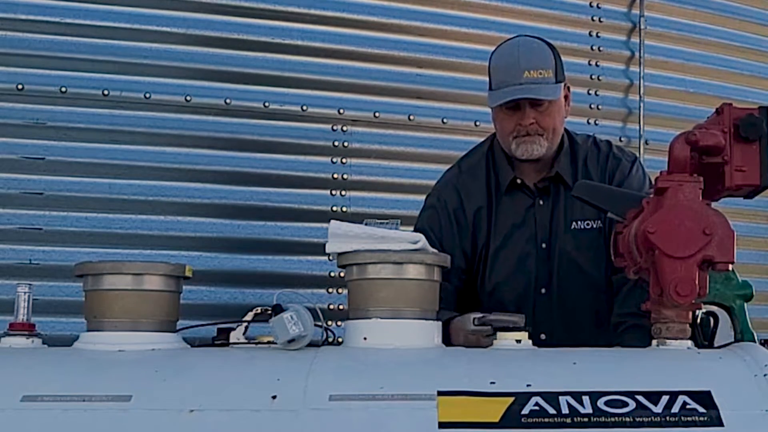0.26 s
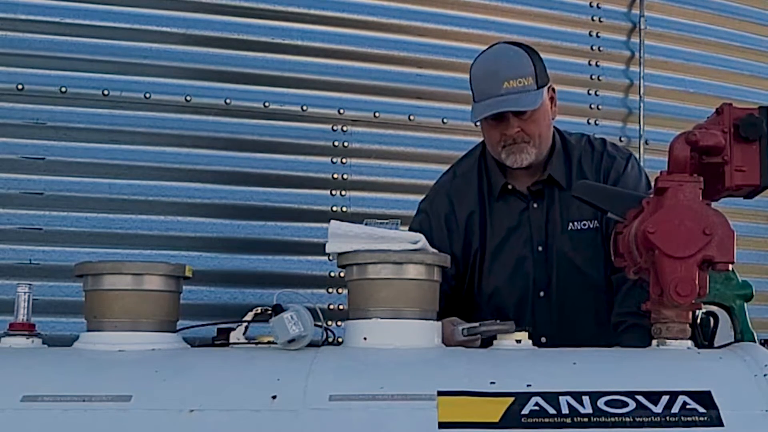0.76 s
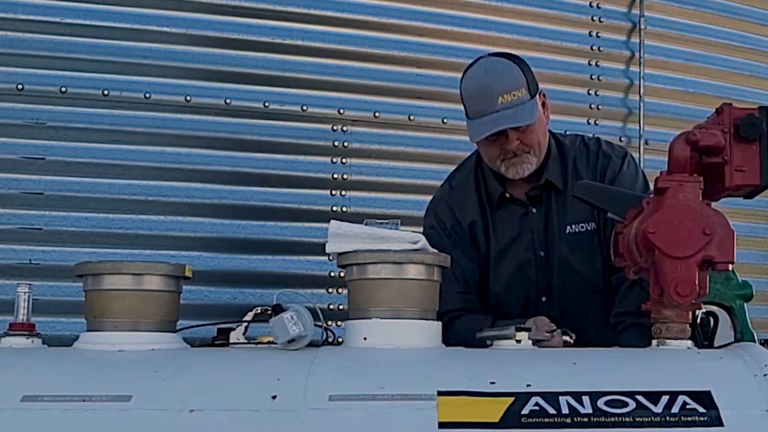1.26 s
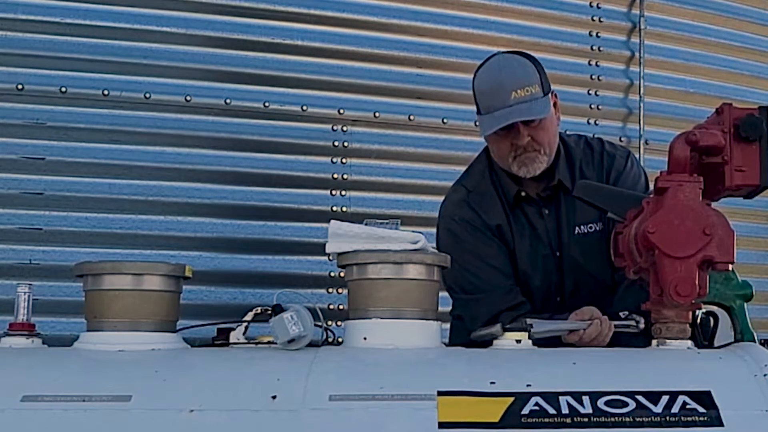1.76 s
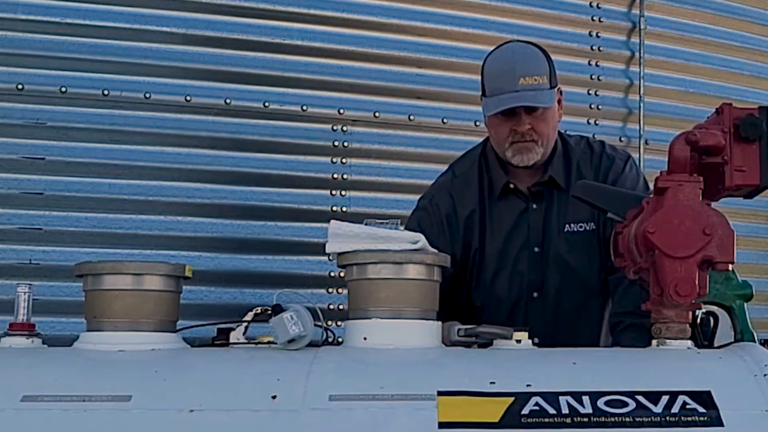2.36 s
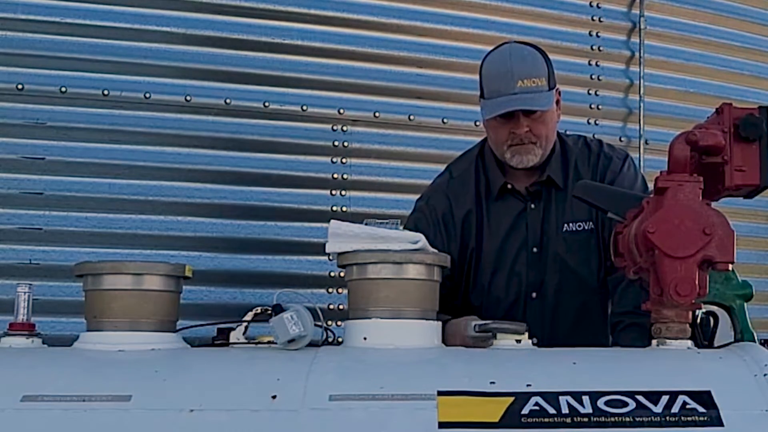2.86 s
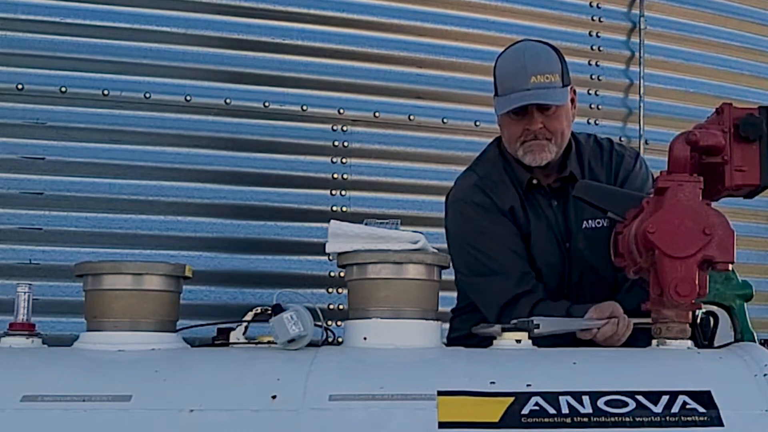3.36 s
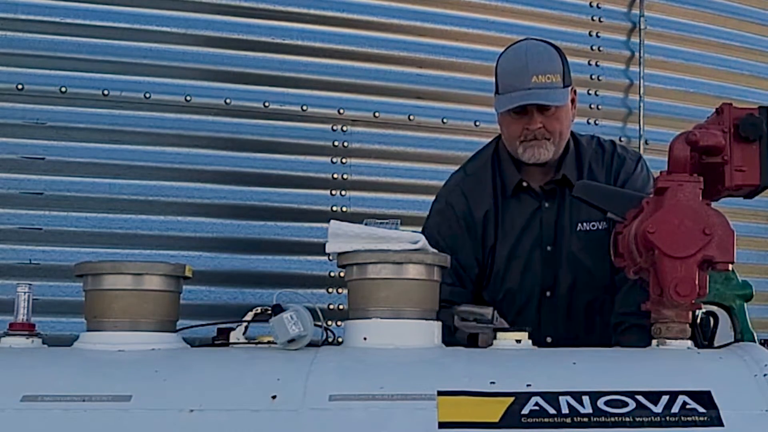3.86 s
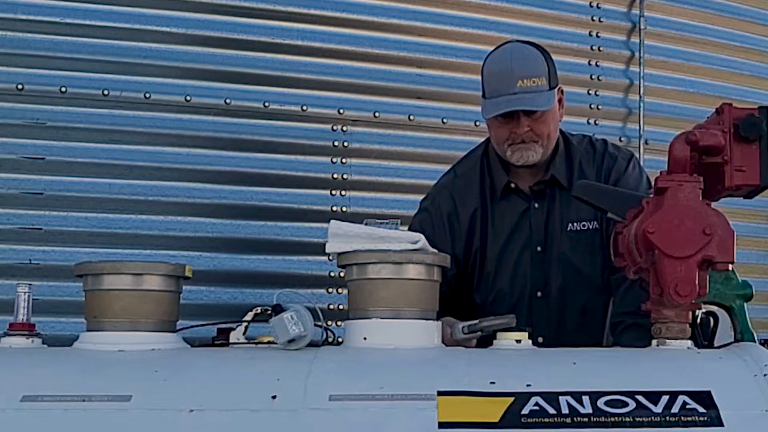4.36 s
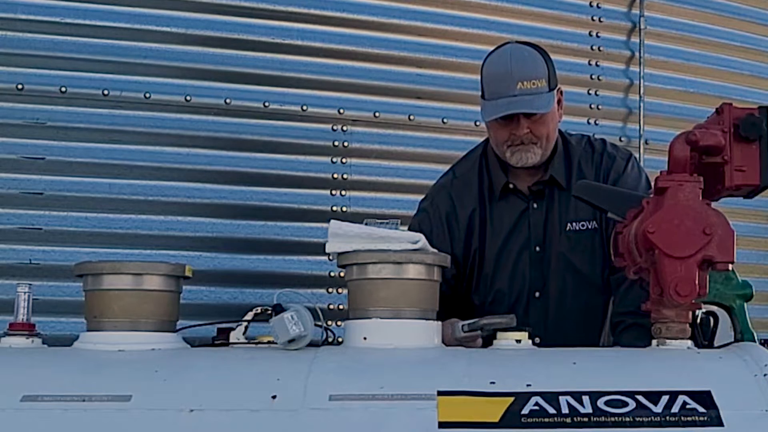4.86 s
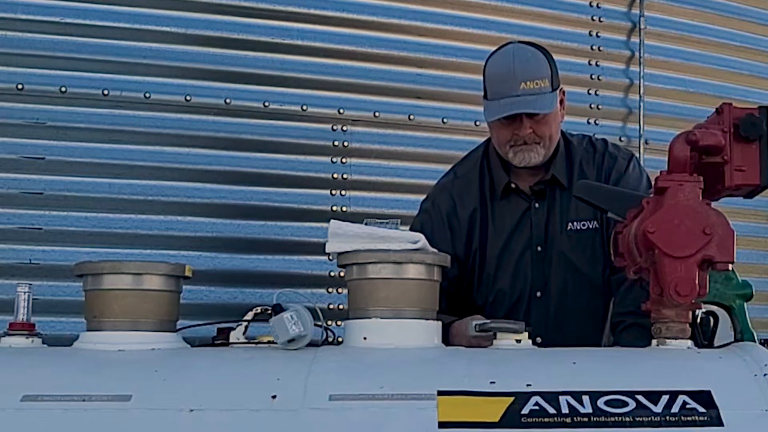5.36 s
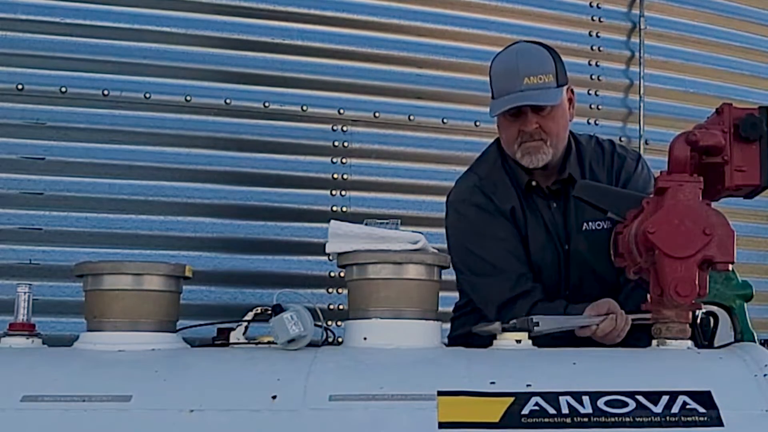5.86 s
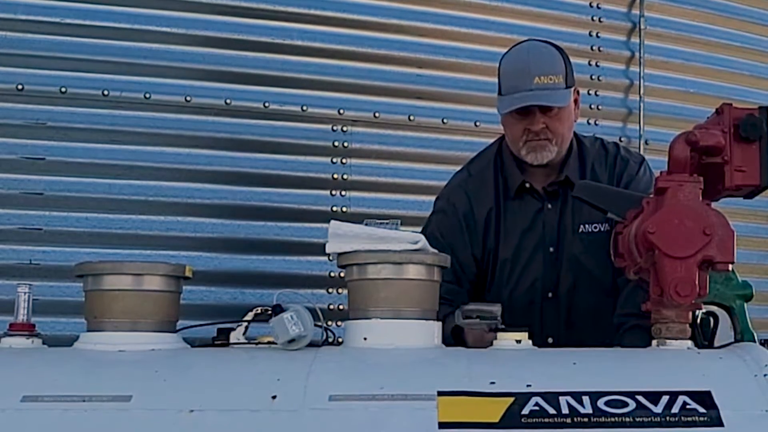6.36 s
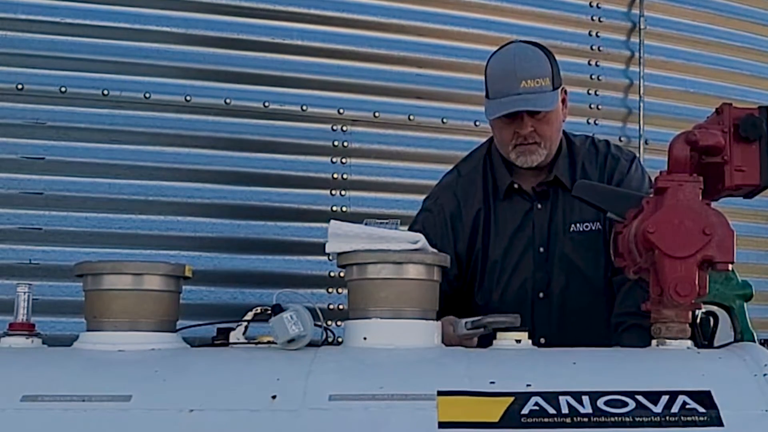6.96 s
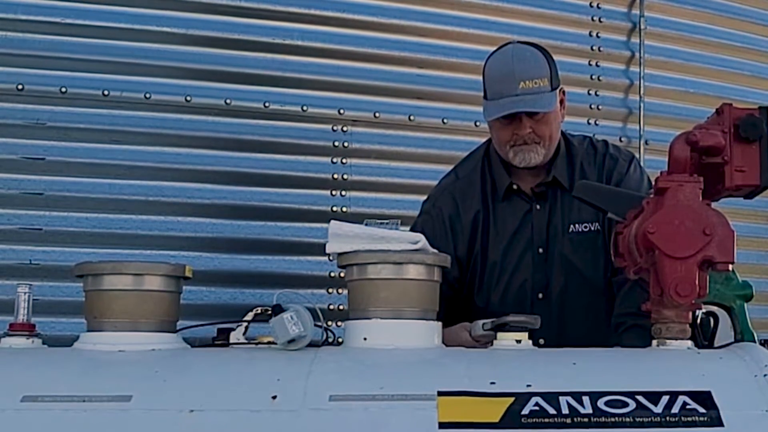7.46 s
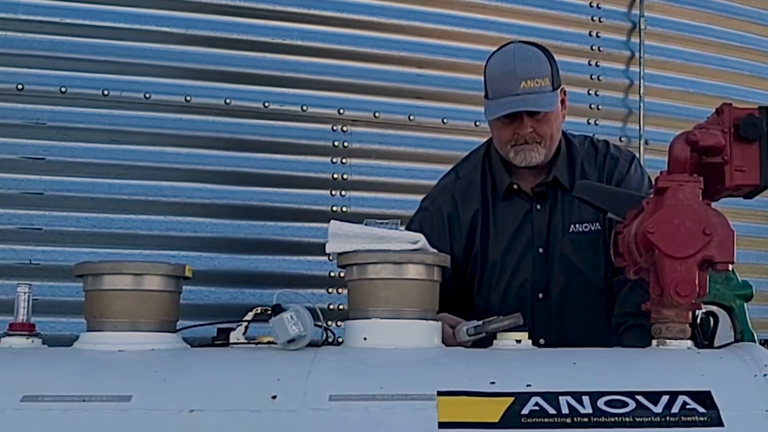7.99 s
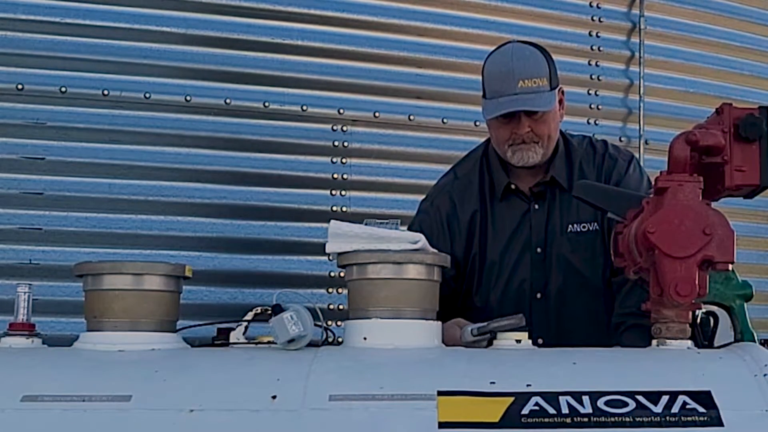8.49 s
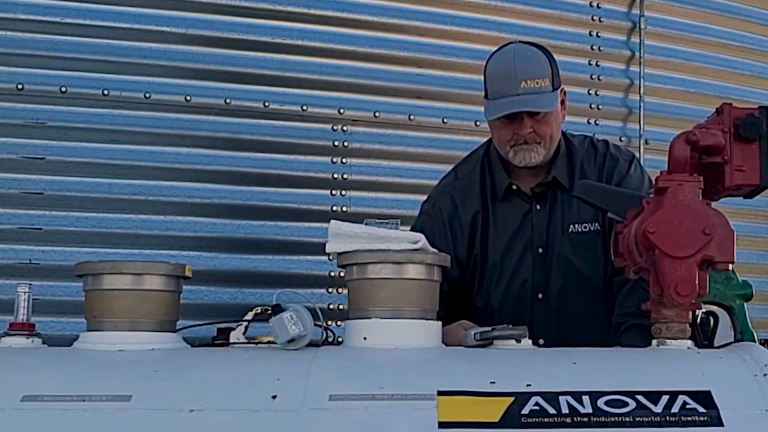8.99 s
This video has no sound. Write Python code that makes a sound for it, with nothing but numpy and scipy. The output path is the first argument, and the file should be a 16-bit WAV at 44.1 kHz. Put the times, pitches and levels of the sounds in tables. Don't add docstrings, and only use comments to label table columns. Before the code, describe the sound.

Outdoors, a couple of metres from a phone, a pipe wrench is worked round a fitting on a large steel tank. A ringing hit opens, then threads drag and scrape, knocks and loose-jaw clinks come in uneven clusters, each with a hollow low ring. Wind gusts rumble and thump the microphone, strongest past the middle. After a quieter gap, heavy booming bangs end it, over a faint hiss that swells with the sounds.

```python
import sys
import numpy as np
from scipy import signal
from scipy.fft import irfft, next_fast_len
from scipy.io import wavfile
from scipy.ndimage import uniform_filter1d

SR = 44100
rng = np.random.default_rng(int(sys.argv[2]) if len(sys.argv) > 2 else 0)


def elevation(decibels):
    levels = np.asarray(decibels, float)
    return 10 ** (levels / 20)


def dump(signal):
    limited = np.clip(np.atleast_2d(signal).T, -1, 1)
    pcm = np.round(limited * 32767).astype(np.int16)
    wavfile.write(sys.argv[1], SR, pcm)


N = 407043


def on_log(hz, table):
    f, v = np.transpose(table)
    return np.interp(np.log(np.maximum(hz, 1)), np.log(f), v)


def unit(x):
    return x / np.sqrt(np.mean(x ** 2))


def noise(table):
    size = next_fast_len(N, True)
    hz = np.arange(size // 2 + 1) * SR / size
    inside = (hz > table[0][0]) & (hz < table[-1][0])
    real, imag = rng.standard_normal((2, len(hz)))
    spectrum = (real + 1j * imag) * elevation(on_log(hz, table)) * inside
    return unit(irfft(spectrum, size)[:N])


def train(times, sizes):
    out = np.zeros(N)
    np.add.at(out, np.clip((times * SR).astype(int), 0, N - 1), sizes)
    return out


def fade(x, t60):
    return signal.lfilter([1], [1, -np.exp(-np.log(1000) / (t60 * SR))], x)


def ring(x, hz, t60):
    pole = np.exp(2j * np.pi * hz / SR - np.log(1000) / (t60 * SR))
    return signal.lfilter([1], [1, -pole], x).imag


def walk(rate):
    k = int(SR / rate)
    steps = np.repeat(rng.standard_normal(N // k + 1), k)
    return unit(uniform_filter1d(steps, k)[:N])


def lay(times, sounds):
    out = np.zeros(N + SR)
    for s, sound in zip(times, sounds):
        out[max(int(s * SR), 0):][:len(sound)] += sound
    return out[:N]


def burst(times, sizes, length):
    t = np.arange(int(.2 * SR)) / SR
    shape = np.exp(-(t / length) ** 2) * np.minimum(t / 0.00086, 1)
    return lay(times, np.outer(sizes, shape))


# frequency_hz, density_db
AIR_SPECTRUM = [(53, -27.5), (90, -1), (205, 1), (265, -9), (508, -17), (658, -23), (950, -23.5),
                (1150, -29.5), (2070, -35), (3480, -28.5), (12200, -38.5), (14500, -35), (15800, -47.5)]


def open_air(busy_db):
    opening_db = 0.089 * np.clip(busy_db + 72.5, 0, 40)
    return noise(AIR_SPECTRUM) * elevation(-62.5 + opening_db + 0.56 * walk(3.5))


# start_s, boom_db, body_db, bang_db, clatter_db
BANGS = [
    (0.001, -23.5, -17.5, -31, -42),
    (8.291, -20, -33, -27, -27),
    (8.713, -14.5, -29, -18, -19),
    (8.8753, -18.5, -11.5, -11.5, -12.5),
]
# start_s, level_db, tilt_db_per_octave, clatter_db
THUDS = [(0.05, -36.5, -4.5, -38.5), (0.905, -63, 5, -55), (1.095, -35, 1, -44.5), (1.313, -54.5, 0, -60),
         (1.392, -47, -5, -66), (1.751, -48.5, -15, -58), (3.452, -53.5, -8.5, -45.5),
         (3.493, -50, -13, -49), (3.526, -58, -0.5, -46), (3.582, -56.5, 4.5, -49.5),
         (4.506, -61.5, -13, -57), (4.987, -49.5, 1.5, -55), (5.73, -56, -1.5, -85), (5.96, -48.5, -6, -39),
         (6.008, -51, -10, -40), (6.059, -46.5, -8.5, -48.5), (8.681, -53, -8, -53.5)]
# start_s, level_db, tilt_db_per_octave, clatter_db
KNOCKS = [(0.153, -30, -1.5, -44.5), (0.918, -38.0, -12.5, -56), (1.083, -30, 2, -66),
          (1.185, -29.5, -8, -48), (1.776, -35.5, 0, -40.5), (1.885, -35.5, -7, -47),
          (2.361, -30.5, -0.5, -47.5), (2.391, -33.5, -12, -51), (2.446, -18.5, 10, -29.5),
          (2.53, -21, -8.5, -34.5), (2.648, -38, -10, -43), (2.712, -18, -5, -36),
          (4.043, -25.5, -0.5, -47), (5.233, -44.5, -9.5, -47.5), (5.495, -33.5, -9, -47.5),
          (6.555, -29.5, -8.5, -48), (6.745, -29, -9, -52), (7.208, -35.5, -8.5, -59),
          (5.93, -41.5, -24, -67)]
# start_s, level_db, tilt_db_per_octave, clatter_db
SLAPS = [(0.721, -36.5, 6.5, -50), (0.745, -32, -9.5, -49.5), (1.986, -68, -13, -53.5),
         (2.551, -26.5, -5.5, -38), (2.958, -32.5, -3.5, -53), (3.753, -54, 0, -57),
         (3.801, -14.5, -1.5, -35.5), (4.013, -41, -22.5, -60), (4.113, -38.5, -3, -47),
         (4.796, -29.5, 4.5, -48), (5.004, -39.5, -14.5, -47), (5.034, -38, -11.5, -44.5),
         (5.383, -29, -9, -51.5), (6.542, -26, -12, -60), (6.752, -24.5, -6, -41.5),
         (7.124, -30, -0.5, -64), (7.43, -34.5, 0.5, -80), (7.452, -24.5, -5, -68),
         (7.487, -21.5, -8, -40.5), (7.551, -32, -8, -43.5), (7.749, -39.5, -1.5, -43.5),
         (7.939, -45, -13, -53)]
# middle_bulge_db, sizzle_re_clatter_db
THUD_KIND = (-8.5, -30)
KNOCK_KIND = (9.87, -29.5)
SLAP_KIND = (10.4, -8.5)
COLUMN_HZ = [210, 480, 950, 2300, 9000]


def blows():
    octaves = np.log2(np.array(COLUMN_HZ[:3]) / COLUMN_HZ[1])
    off_middle = octaves != 0
    rows = []
    for table, (bulge_db, sizzle_db) in ((THUDS, THUD_KIND), (KNOCKS, KNOCK_KIND), (SLAPS, SLAP_KIND)):
        for s, db, tilt, clatter in table:
            low = db + tilt * octaves - bulge_db * off_middle
            rows.append((s, *low, clatter, clatter + sizzle_db))
    bangs = [(*row, row[-1] - 45) for row in BANGS]
    return np.array(sorted(rows)), np.array(bangs)


def strike(hits):
    push = uniform_filter1d(train(hits[:, 0], elevation(hits[:, 3:5].mean(axis=1))), size=8)
    return elevation(6.0) * ring(push, 918, 0.014) + elevation(-13.0) * ring(push, 2600, 0.0033)


# frequency_hz, level_over_crowd_db
SHELL_LINES = [(127, 5), (204, 5.5), (414, 7), (517, 4.5), (608, 10), (794, 7.5), (941, 5.5), (1097, 6)]
# frequency_hz, t60_s
SHELL_T60 = [(100, 0.58), (240, 0.59), (500, 0.72), (950, 0.64), (1500, 0.43)]
# frequency_hz, level_db
SHELL_RADIATION = [(95, -1), (140, 3.5), (200, 4.5), (290, 0), (480, -0.5), (650, -5), (950, 0.5),
                   (1150, -5.5), (1350, -9.5), (1600, -13.5)]


def shell_boom(hits, linger, count=260):
    crowd = np.sort(rng.uniform(95, 1600, count))
    hz = np.r_[crowd, [f for f, _ in SHELL_LINES]]
    t60 = linger * on_log(hz, SHELL_T60) * rng.uniform(0.74, 1.197, len(hz))
    t = np.arange(0, .8, 4 / SR)[None]
    decay = np.exp(-np.log(1000) * t / t60[:, None]) + elevation(-7.5) * np.exp(-t / 0.016)
    rise = 1 - np.exp(-t * hz[:, None] ** 2 / 900)
    modes = np.sin(2 * np.pi * hz[:, None] * t) * decay * rise
    mix = rng.uniform(-1.84, 1.69, (len(hits), len(hz)))
    stand_db = np.r_[0 * crowd, [db for _, db in SHELL_LINES]] + on_log(hz, SHELL_RADIATION)
    colour_db = np.array([on_log(hz, list(zip(COLUMN_HZ, row[1:]))) for row in hits])
    sounds = (mix * elevation(colour_db + stand_db + 3 - 10 * np.log10(count))) @ modes
    return lay(hits[:, 0], signal.resample_poly(sounds, 4, 1, axis=1))


# frequency_hz, level_db
SHEEN = [(1300, -6), (1800, -3.5), (2600, -1.5), (3400, -3), (4200, -2), (6000, -6), (9000, -2.5),
         (12500, -12.5), (15500, -20)]
# frequency_hz, t60_s
KNOCK_T60 = [(1300, 0.31), (3500, 0.3), (6000, 0.27), (15000, .14)]
# frequency_hz, t60_s
BANG_T60 = [(1300, 0.81), (3200, 0.52), (3900, 0.13), (15000, 0.19)]


def shell_treble(knocks, bangs):
    out = 0
    for hz in 1300 * 2 ** np.arange(0, 3.5, .3):
        power = 0
        for hits, ring_s, ring_db in ((knocks, KNOCK_T60, -1), (bangs, BANG_T60, -14)):
            db = np.array([on_log(hz, list(zip(COLUMN_HZ[3:], row[4:]))) for row in hits])
            energy = elevation(2 * (db + on_log(hz, SHEEN)))
            taps = train(hits[:, 0], energy)
            power = power + elevation(ring_db) * fade(taps, on_log(hz, ring_s) / 2)
            power = power + elevation(0.5 - hz / 800) * fade(taps, .035)
            power = power + hz / 9000 * burst(hits[:, 0], energy, 0.04)
        power = power + elevation(13) * fade(taps, 0.09)
        swell = np.sqrt(np.abs(uniform_filter1d(power, size=40)))
        grit = elevation(hz / 4000 * walk(350))
        out = out + swell * grit * noise([(hz, 0), (hz * 2 ** .3, 0)])
    return elevation(-14.0) * out


# peak_s, level_db, rise_s, fall_s
GUSTS = [(0.001, -19.5, 0.017, 0.012), (.1, -48, .07, 0.34), (.34, -38, 0.3, 0.51),
         (.62, -46.5, 0.22, 0.29), (1.31, -49, 1, 0.79), (1.82, -55, 0.32, 0.73), (2.16, -53.5, .25, .28),
         (2.8, -59.5, 0.43, .17), (3.65, -45, 0.18, 0.15), (3.83, -46, 0.14, .6), (4.14, -32.5, 0.49, 0.17),
         (4.32, -37, 0.2, .06), (4.52, -39.5, 0.079, 0.23), (5.22, -35, 0.093, 0.087),
         (5.35, -24, 0.11, 0.11), (5.42, -31, 0.073, 0.48), (6.09, -25.5, 0.13, 0.18),
         (6.38, -19.5, 0.46, 0.29), (6.79, -45, .15, 0.17), (7.04, -35.5, 0.09, 0.71),
         (7.28, -28, 0.29, 0.2), (7.56, -34.5, 0.99, .09), (7.64, -29.5, 0.13, 0.056),
         (7.76, -27.5, 0.14, 0.15), (8.41, -59.5, 6.2, .33), (9.13, -30, 0.098, 1.5)]
# frequency_hz, density_db
GUST_SPECTRUM = [(11, -38), (22, -12), (38, -1.5), (60, 1.5), (84, -6), (160, -29.5), (210, -57.5),
                 (350, -120)]
# start_s, level_db
THUMPS = [(.325, -24), (4.282, -24), (4.482, -28.5), (5.324, -33), (6.06, -21), (6.353, -8), (7.039, -31),
          (7.18, -24), (7.237, -13), (7.273, -15.5), (7.312, -21), (7.746, -12.5)]


def wind():
    t, level_db = np.arange(N) / SR, -67.5
    for s, db, rise, fall in GUSTS:
        away = np.maximum((s - t) / rise, (t - s) / fall)
        level_db = np.maximum(level_db, db - 31 * away)
    rumble = noise(GUST_SPECTRUM) * elevation(level_db + 3.4 * walk(14) - 2.0)
    s, db = np.transpose(THUMPS)
    slam = uniform_filter1d(train(s + 0.0075, elevation(db)), size=260)
    return rumble - elevation(0.5) * ring(slam, 53.0, 0.083)


# start_s, level_db, teeth_re_level_db, tinkle_re_level_db
HOOK_CLINKS = [(.0014, -53, -15, -31), (.0524, -43.5, -14, -23), (.7203, -41.5, -3, -16),
               (.7434, -45.5, -16, -15), (.907, -56, 0, -18), (2.381, -41, -12, -39.5),
               (4.0137, -55, -6, -26), (4.0442, -39, -13, -26), (4.1118, -37.5, -22, -24),
               (5.0027, -38.5, -4, -4.5), (5.4, -50.5, -14, -37), (6.7524, -47, 4, -38.5),
               (7.5204, -36, -12, -24), (7.755, -36.5, -8, -21), (7.9414, -43, -8, -16)]
# start_s, level_db, teeth_re_level_db, tinkle_re_level_db
HANDLE_CLINKS = [(1.108, -45, -13, -44), (1.1854, -55, -28, -48), (1.7749, -45, -29, -41),
                 (2.5304, -35, -4, -28), (4.7964, -37.5, -17, -23), (5.496, -52, -3, -41),
                 (6.5565, -35, -25, -50), (7.4854, -28.5, -19, -28), (7.5534, -32.5, -19, -17.5),
                 (7.767, -38.5, -7, -16)]
# start_s, level_db, teeth_re_level_db, tinkle_re_level_db
NUT_CLINKS = [(1.76, -48.5, -28, -38), (1.9856, -50.5, 0, -38), (2.381, -44.5, -11.5, -50),
              (2.4473, -45.5, -16, -35.5), (2.55, -38.5, -5, -14), (2.9564, -51.5, 2, -47),
              (3.4507, -43, -29.5, -44), (3.753, -55, -8, -27), (3.8046, -36, -2, -22),
              (3.829, -44.5, 4, -17.5), (4.9883, -46.5, -8, 1.5), (5.034, -43, 3, -21),
              (5.9574, -35, -29, -53), (6.007, -47, -5, -36)]
# start_s, level_db, teeth_re_level_db, tinkle_re_level_db
HANDLE_TICKS = [(4.7092, -65, -15, -33), (5.2325, -41.5, -37, -38), (7.209, -55, -36.5, -33),
                (7.3662, -60, -16, -29)]
# handle_modes_db, hook_modes_db, nut_modes_db
HANDLE_REACH = (0, -15.5, -7)
HOOK_REACH = (-11.5, 0, -8)
NUT_REACH = (-6, -18.5, 0)
TICK_REACH = (0, -27, -19)


def clinks():
    rows = []
    for table, reach in ((HANDLE_CLINKS, HANDLE_REACH), (HOOK_CLINKS, HOOK_REACH),
                         (NUT_CLINKS, NUT_REACH), (HANDLE_TICKS, TICK_REACH)):
        for s, db, teeth, tinkle in table:
            rows.append((s, *(db + np.r_[reach, teeth, tinkle])))
    return np.array(rows)


JAW_HZ = [1490, 2080, 2230, 3170, 3480, 3400, 4600, 4670, 6620, 8030, 9050, 12010, 15620]
JAW_GROUPS = [(1, 1), (2, 2), (2, 2), (3, 3), (3, 3), (3, 3), (4, 4), (4, 4), (4, 5), (4, 5), (5, 5),
              (5, 5), (5, 5)]
# t60_s, level_db
JAW_MODES = [(0.065, -3.5), (0.087, 0), (0.15, -22.5), (0.041, -5.5), (0.11, -6.5), (0.0026, 12),
             (0.0089, 0), (0.047, -2), (0.062, -6), (0.045, -15), (0.086, -14), (0.041, 2.5), (.04, -25)]


def jaw(hits):
    grain = elevation(4.34 * walk(300))
    out = 0
    for hz, groups, (t60, db) in zip(JAW_HZ, JAW_GROUPS, JAW_MODES):
        sizes = elevation(hits[:, groups].mean(axis=1) + db)
        contacts = grain * noise([(0.9 * hz, -25), (0.77 * hz, 0), (1.227 * hz, 0), (1.139 * hz, -25)])
        slide = elevation(-14) * fade(train(N / SR - hits[:, 0], sizes), 0.05)[::-1]
        rattle = burst(hits[:, 0], sizes, 0.025)
        out = out + ring((slide + rattle) * contacts, hz, t60) * np.sqrt(hz)
    return elevation(-74.5) * out


# start_s, pitch_hz, level_db, contact_s
PINGS = [(0.002, 4660, -67, 0.03), (0.052, 4660, -64.5, 0.07), (0.2, 2100, -69, 0.1),
         (0.752, 3500, -45, 0.011), (0.739, 5300, -58, 0.015), (1.106, 4510, -62, 0.015),
         (1.108, 2170, -48, 0.02), (1.106, 3100, -57, 0.015), (2.377, 3410, -42.5, 0.031),
         (2.441, 4650, -59, 0.05), (2.53, 4670, -43, 0.044), (2.552, 8030, -48.5, 0.014),
         (2.552, 12000, -60, 0.03), (2.552, 15630, -74, 0.03), (2.71, 4620, -51, 0.018),
         (2.713, 5500, -56, 0.01), (2.71, 2370, -45.5, 0.02), (2.713, 7900, -68, 0.01),
         (2.957, 4740, -51, 0.015), (3.451, 1910, -47, 0.028), (3.745, 4720, -69, 0.04),
         (3.806, 3485, -36.5, 0.035), (3.8, 6540, -47, 0.029), (4.045, 4600, -59, 0.044),
         (4.119, 4640, -54, 0.03), (4.71, 4630, -75, 0.03), (4.71, 3190, -74.5, 0.03),
         (4.797, 3530, -43, 0.025), (4.797, 3150, -50, 0.043), (5.005, 2100, -52, 0.022),
         (5.01, 12010, -46, 0.03), (5.024, 4660, -53, 0.017), (5.497, 4680, -58, 0.02),
         (6.559, 3040, -47, 0.035), (6.55, 3520, -56, 0.02), (6.742, 2090, -54, 0.02),
         (6.757, 3560, -46, 0.023), (6.762, 4680, -61, 0.027), (7.12, 4680, -60, 0.03),
         (7.136, 2070, -63, 0.015), (7.13, 1510, -65, 0.017), (7.132, 5250, -66, 0.01),
         (7.54, 4700, -57, 0.049), (7.767, 11900, -56, 0.024), (8.714, 8000, -64, 0.01),
         (8.714, 10590, -60, 0.0089), (8.884, 4700, -42, 0.022), (8.885, 9050, -61, 0.031),
         (8.88, 12000, -65, 0.025), (8.893, 15620, -77, 0.02)]


def ping():
    t = np.arange(int(.2 * SR)) / SR
    rough = rng.standard_normal((len(PINGS), len(t)))
    rough[:, 0] = 6.3
    sounds = []
    for (_, hz, db, contact), drive in zip(PINGS, rough):
        tone = ring(drive * np.exp(-(t / contact) ** 2), hz, 1.7 * contact)
        sounds.append(elevation(db + 4.5) * tone / np.max(np.abs(tone)))
    return lay([s for s, *_ in PINGS], sounds)


# start_s, pitch_hz, level_db, t60_s
CLANGS = [(.002, 466, -32, 1), (.002, 940, -46.5, .8), (1.097, 799, -42, 0.61), (1.19, 216, -35.5, .4),
          (1.751, 210, -43, 0.25), (2.447, 945, -35, 0.53), (2.714, 430, -28, 0.75),
          (2.714, 835, -46, 0.33), (2.714, 900, -49, .5), (3.802, 520, -30, 0.087), (3.802, 1100, -38, .3),
          (3.802, 1270, -40, 0.43), (4.045, 519, -34, .4), (5.96, 1940, -37.5, 0.043),
          (6.556, 204, -26, 0.5), (7, 195, -25.5, .5), (7.49, 526, -32, 0.54), (8.292, 153, -33, 0.41),
          (8.292, 382, -34.5, 0.68), (8.292, 940, -37.5, 0.81), (8.32, 980, -26, 0.09),
          (8.714, 210, -24.5, 0.26), (8.714, 815, -28, 0.36), (8.877, 199, -24, 0.73),
          (8.877, 800, -27, 0.26), (8.877, 937, -21, .4), (8.877, 1550, -22, 0.3),
          (8.8712, 3700, -36, .003), (8.876, 1900, -4, 0.0012), (8.8762, 5150, -22, 0.0021),
          (1.0965, 1590, -32, .003), (2.4465, 1500, -20.5, .003), (1.99, 9400, -55, .01),
          (2.545, 10000, -46, .005), (7.743, 10500, -57, .006), (7.54, 8700, -46, .008),
          (3.806, 9050, -46, 0.11), (3.806, 3470, -30.5, .17), (2.448, 4670, -58, .16),
          (4.045, 1980, -48, 0.11), (.72, 2100, -55, 0.43), (.91, 2330, -61, 0.22), (4.9, 200, -44, 0.51),
          (5.42, 254, -31.5, .2), (2.94, 237, -38.5, 0.34), (.76, 400, -39, 0.55), (8.885, 558, -23.5, .4),
          (2.7135, 627, -22.5, 0.064)]


def clang():
    sounds = []
    for _, hz, db, t60 in CLANGS:
        tap = signal.unit_impulse(int(t60 * SR) + 200)
        push = ring(tap, hz, 2.5 / hz)
        tone = ring(push, hz, t60)
        sounds.append(elevation(db) * tone / np.max(np.abs(tone)))
    return lay([s for s, *_ in CLANGS], sounds)


# start_s, rise_s, length_s, peak_db, fall_db_per_s
SCRAPES = [
    (0.222, 0.012, 0.69, -41.5, 34),
    (1.24, 0.1, 0.44, -42.5, 33),
    (1.756, 0.014, 0.29, -38.5, 51),
    (3.464, .01, 0.24, -51, 64),
    (5.359, 0.0071, 0.14, -35.5, 40),
    (5.702, 0.043, 0.21, -52, 90),
    (7.443, 0.073, 0.21, -30.5, 116),
]


def scrape():
    t, level = np.arange(N) / SR, np.zeros(N)
    for s, rise, length, db, fall in SCRAPES:
        edge = np.clip(np.minimum(t - s, s + length - t) / 0.068, 0, 1)
        late = np.clip(t - s - rise, -rise, length)
        level += edge * elevation(db + np.minimum(13 * late / rise, -fall * late))
    rub = noise([(150, 9), (400, 24.5), (900, 18.0), (1600, -4.0), (2500, -16.0),
                 (3000, -16.0), (3400, -14.0), (9000, -31)])
    return elevation(-4.0) * level * rub * elevation(0.82 * walk(200))


RASP_S = [1.35, 1.47, 1.83, 2.675, 3.49, 3.6, 5.41, 5.485, 7.47, .712, .76, .93, 7.51, 7.58, 7.78, 7.97]
# half_length_s, level_db
RASPS = [(0.058, -63), (0.067, -62.5), (0.045, -58.5), (.03, -64), (0.033, -60), (0.035, -63.5),
         (0.031, -56), (.012, -59), (0.019, -60), (0.011, -62), (0.027, -58), (0.027, -65), (0.029, -50),
         (0.037, -50), (.03, -53.5), (0.029, -63.5)]
# start_s, pitch_hz, level_db,
# slip_s
CREAKS = [(0.901, 1087, -54.5, 0.055), (8.303, 1090, -42.5, 0.094), (0.76, 434, -47.5, 0.12),
          (2.718, 471, -36.5, 0.15), (4.806, 528, -40.5, 0.096), (4.966, 510, -54, 0.028),
          (5.731, 857, -54.5, 0.079), (7.927, 578, -54.5, 0.081), (8.88, 552, -24, .06)]


def creak():
    t = np.arange(N) / SR
    swell = sum(elevation(db) * np.exp(-((t - s) / half) ** 2) for s, (half, db) in zip(RASP_S, RASPS))
    rasp = noise([(1400, 3.5), (2000, -1), (3000, -4), (3500, -7), (5200, -19)])
    out = swell * elevation(2.0 * walk(250)) * rasp
    slips = noise([(400, 0), (1200, 0)])
    for s, hz, db, length in CREAKS:
        slip = burst(np.array([s]), np.ones(1), length) * slips
        out = out + elevation(db - 29.5) * ring(slip, hz, 0.051)
    return out


# start_s, pitch_hz, level_db
SNAPS = [(1.0965, 1190, -40), (1.186, 2500, -36), (3.4545, 3270, -26), (3.463, 3300, -35),
         (3.528, 3150, -31), (3.584, 1150, -32), (3.803, 1305, -13.5), (5.96, 3280, -20),
         (8.7129, 1850, -17), (8.875, 990, -13)]


def snap():
    tap = signal.unit_impulse(SR // 10)
    bites = []
    for _, hz, db in SNAPS:
        push = ring(tap * elevation(db) * hz / SR, hz, 0.0057)
        bites.append(ring(push, hz, 26 / hz))
    return lay([s for s, *_ in SNAPS], bites)


def scene():
    knocks, bangs = blows()
    boom = shell_boom(knocks, linger=0.91) + shell_boom(bangs, linger=1.146, count=480)
    steel = strike(np.r_[knocks, bangs]) + boom + shell_treble(knocks, bangs)
    steel = steel + jaw(clinks()) + ping() + clang() + scrape() + snap()
    steel = signal.sosfilt(signal.butter(4, 75, "high", fs=SR, output="sos"), steel)
    busy_db = 10 * np.log10(np.abs(uniform_filter1d(steel ** 2, size=2500)) + 1e-8)
    shut = elevation(0.3 * np.clip(busy_db + 41.0, -22, 0))
    return (steel * shut + open_air(busy_db) + wind() + creak())[None]


def low_pass(x):
    return signal.sosfilt(signal.butter(12, 16490, fs=SR, output="sos"), x)


def record(dry):
    dry = dry * np.minimum(np.arange(N) / 60, 1)
    mix = np.clip(dry, -.99, .99)
    return low_pass(mix)


dry = scene()
out = record(dry)
dump(out)
```